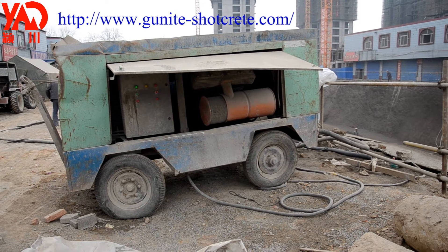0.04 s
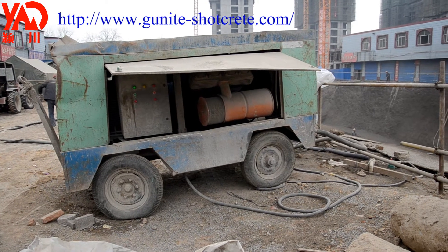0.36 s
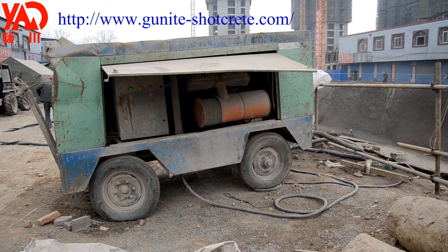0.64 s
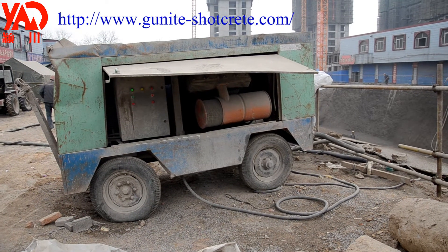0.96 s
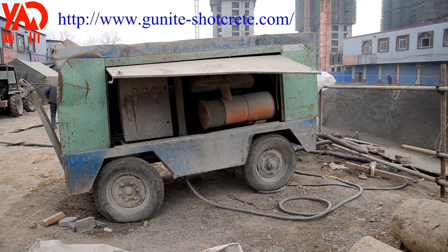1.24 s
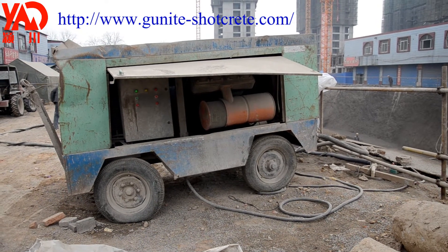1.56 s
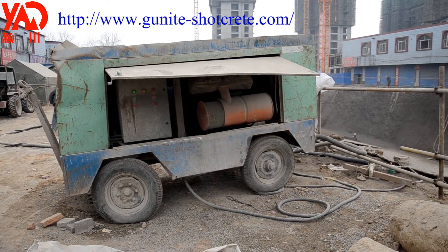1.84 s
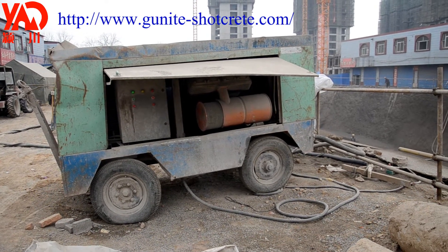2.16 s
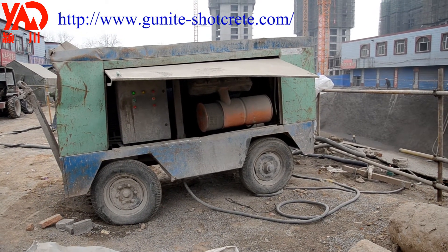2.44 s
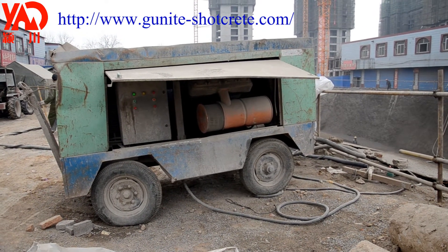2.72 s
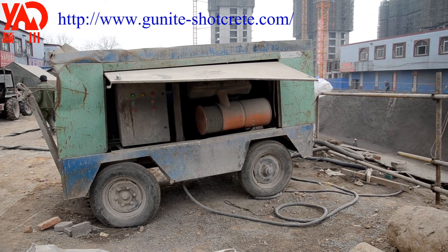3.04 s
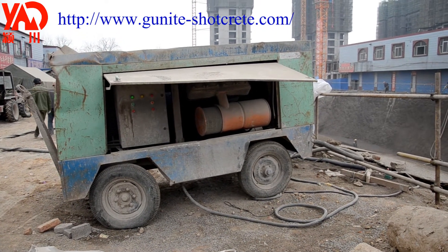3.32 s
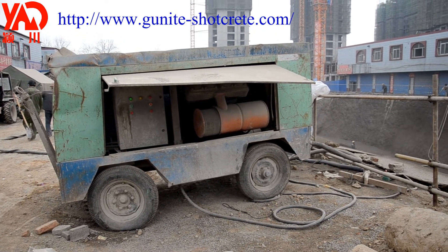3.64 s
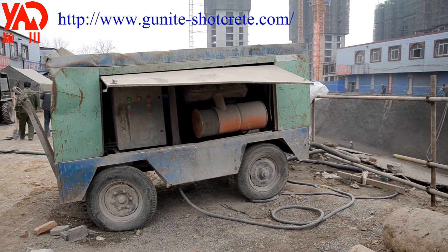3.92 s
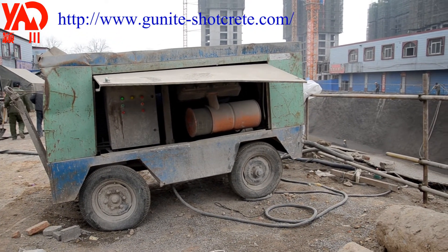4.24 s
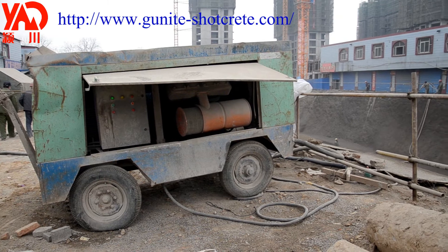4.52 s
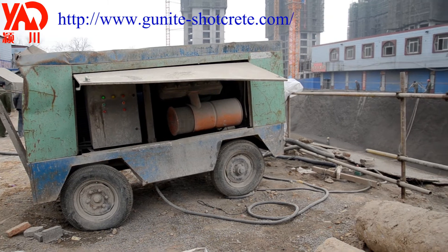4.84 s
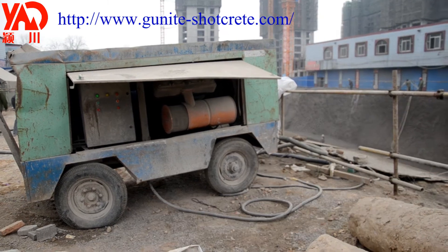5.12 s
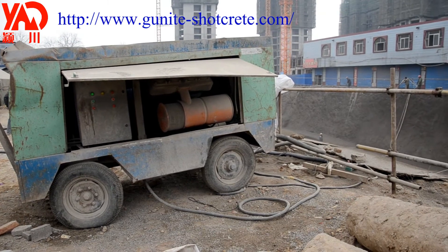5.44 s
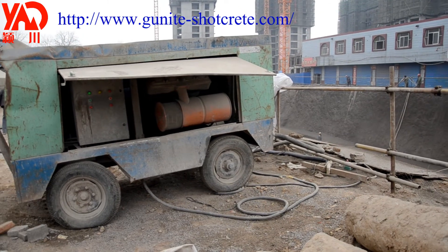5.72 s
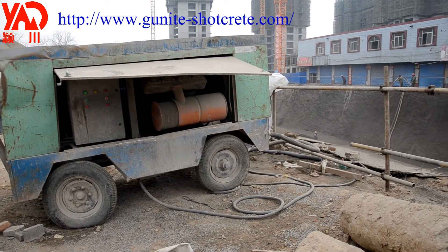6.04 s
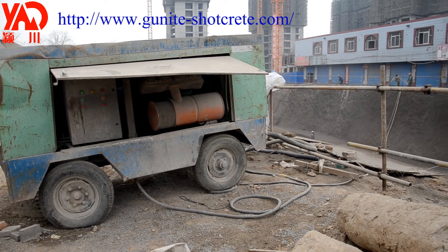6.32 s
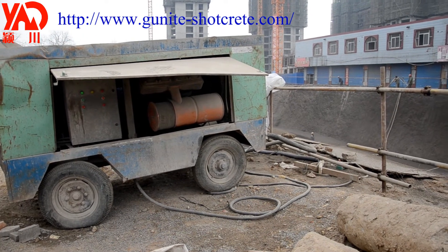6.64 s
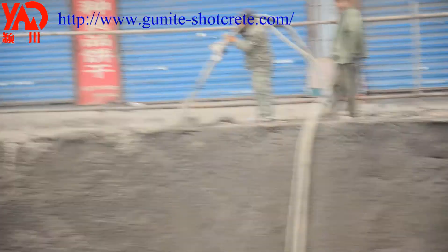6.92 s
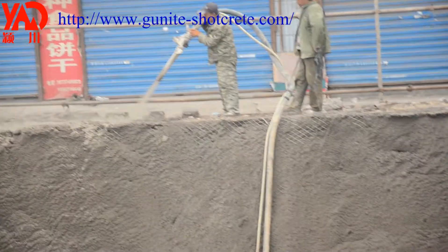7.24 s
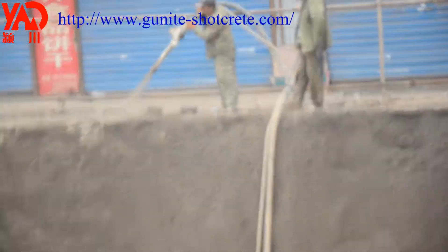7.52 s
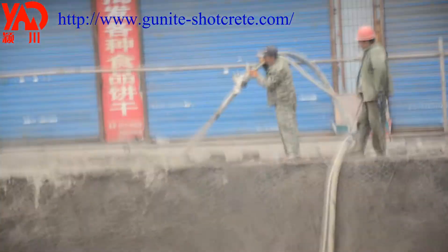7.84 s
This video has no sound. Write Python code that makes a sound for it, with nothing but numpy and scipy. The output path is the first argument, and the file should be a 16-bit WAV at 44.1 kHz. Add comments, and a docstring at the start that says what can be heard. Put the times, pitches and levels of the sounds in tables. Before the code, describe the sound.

A towed diesel air compressor runs close by on a building site, loud and at constant speed, with a throbbing drone, rapid knocking and ticking valves. Near the end the sound switches abruptly to a quieter nozzle spraying concrete: a steady hiss of air with grit peppering a wall. Two pebbles click sharply while machinery hums far off.

```python
"""On a building site, a towed diesel air compressor runs at a steady speed with its side hatch open.
Every engine cycle repeats the same booms and knocks over the rumble of burning fuel and valve clatter.
Then the scene changes abruptly to a nozzle spraying concrete: air hisses, grit peppers the wall,
two pebbles hit sharply, and machinery hums far off."""
import sys
import numpy as np
from scipy import signal
from scipy.fft import rfft, irfft, next_fast_len
from scipy.io import wavfile

SR = 44100
rng = np.random.default_rng(int(sys.argv[2]) if len(sys.argv) > 2 else 0)


def master_out(mix):
    """Clip the mix to full scale and print it as 16-bit PCM to the path in sys.argv[1]."""
    frames = np.transpose(np.atleast_2d(mix))
    ceiling = np.clip(frames, -1, 1)
    pcm = np.round(ceiling * 32767).astype(np.int16)
    wavfile.write(sys.argv[1], SR, pcm)


N = 347067

CYCLE_HZ = 16.571   # engine cycles a second; the drone's harmonics are whole multiples of this
CHANGE_S = 6.782   # from compressor to nozzle

# Booms of the exhaust and hood in one cycle: start_cycles, pitch_hz, width_hz, level_db
BOOMS = [(0.0203, 225, 105, -6.9), (0.0692, 758, 118, -1.3), (0.1882, 247, 119, -7.6),
         (0.2781, 419, 187, -8.7), (0.3337, 1116, 149, -9.3), (0.4133, 627, 108, -3.2),
         (0.4944, 828, 53, 3.4), (0.5799, 141, 130, -5.2), (0.7288, 1105, 98, -2.2),
         (0.7759, 259, 109, 0.2), (0.7875, 641, 96, -5.5), (0.8362, 1049, 76, -7.6)]
# Knocks of the injectors and valves in one cycle: start_cycles, decay_cycles, knock_db, tick_db
KNOCKS = [(0.084, 0.017, -13, -12), (0.237, 0.037, -10, -5), (.303, 0.022, 5, -12), (.335, .04, -16, 8),
          (0.39, 0.035, 6.5, -15), (.435, 0.031, 4, -22), (.497, 0.011, 9, -4), (.545, 0.016, 2.5, -2),
          (.685, 0.85, -2, 1.5), (0.837, 0.051, 1, -7)]
# Overall shape of the drone's harmonics: pitch_hz, level_db
DRONE = [(30, -65), (50, -61), (66, -44.5), (350, -43.5), (520, -35.5), (720, -35.5), (900, -35),
         (1000, -42.5), (1200, -36.5), (2200, -40.5), (3000, -46), (4500, -64)]
# Air ringing inside the hood lifts nearby harmonics: pitch_hz, width_hz, lift_db
HOOD_RESONANCES = [(148.5, 11, 5.5), (238, 47, 12), (302.2, 39.4, 13.5), (439, 7.3, 9.5),
                   (1050, 16.6, 16.5)]
# Harmonics that match a panel's own pitch and sing out: pitch_hz, level_db
SINGING_HARMONICS = [(549.1, -30), (597.5, -29), (646.0, -27), (678.3, -23), (694.4, -27), (829.0, -27),
                     (877.5, -30), (995.9, -33), (1077, -24), (1125, -30), (1179, -34), (1475, -35),
                     (1674, -34), (1970, -34)]
# Low noise of burning fuel: pitch_hz, level_db_per_hz
RUMBLE = [(30, -76), (70, -71.5), (95, -56), (115, -62), (138, -48), (172, -55.5), (260, -44), (380, -52),
          (520, -47), (680, -51.5), (850, -48.5), (1080, -47), (1300, -49.5)]
# High noise of the engine's metal parts: pitch_hz, level_db_per_hz
CLATTER = [(1300, -51.5), (2300, -54), (3200, -58), (4600, -59.5), (5300, -62), (6400, -61.5), (7500, -62),
           (8400, -62), (10000, -69), (12000, -80.5), (14000, -86), (15500, -97.5)]
# Ringing of the engine block and covers: pitch_hz, width_hz, lift_db
CASING = [(635, 59, 3.5), (1160, 51, -2.5), (1190, 90, -1), (1720, 57, 4), (1950, 36, -0.5),
          (2135, 43, 6.5), (2380, 85, 5), (2756, 130, 4.5), (3376, 44, 7), (3670, 70, 2.5), (3930, 27, 0.5),
          (3935, 70, 5), (4575, 80, 4), (7535, 160, 7), (8280, 130, 4.5)]
# Puffs of air through the valves in one cycle: peak_cycles, strength_db
PUFFS = [(.25, 1), (.52, 1), (.71, 2)]
# Air jet and site noise at the nozzle: pitch_hz, level_db_per_hz
SPRAY = [(30, -85), (90, -59.5), (170, -60.5), (290, -56.5), (600, -61), (1000, -62.5), (1600, -63.5),
         (3000, -66), (5000, -63), (6500, -66), (8000, -71), (10500, -78.5), (12500, -92), (15500, -102.4)]
# Tones of distant machinery: pitch_hz, level_db
FAR_TONES = [(64.6, -53), (279.9, -40.5), (495.3, -41), (694.4, -58), (748.3, -46), (893.6, -46),
             (969.0, -45), (1077, -44), (1227, -65), (1981, -50)]
# Pebbles bouncing off: start_s, level_db, second_touch_delay_s, second_touch_lift_db
PEBBLE_HITS = [(7.0250, -13.5, .00044, 5), (7.541, -10.5, .00046, 1.5)]
# Tones a pebble rings with, and their time to fade by 60 dB: pitch_hz, level_db, ring_s
PEBBLE_TONES = [(2060, -8, 0.018), (3220, -2, .006), (4640, 0, 0.007), (6300, -15, .010), (8350, -21, .008),
                (9600, -15, .008)]
# Narrow bands that the microphone housing weakens: pitch_hz, width_hz, depth_fraction
MIC_NOTCHES = [(5750, 480, 0.85), (6910, 190, 0.6)]


def from_db(db):
    """Turn decibels into a number to multiply a sound by."""
    return 10 ** (np.asarray(db) / 20)


def seconds():
    """The time of every sample."""
    return np.arange(N) / SR


def level_at(spectrum, hz):
    """Read a level between the rows of a pitch table, with octaves evenly spaced."""
    pitches, levels = np.transpose(spectrum)
    return np.interp(np.log(np.maximum(hz, 1)), np.log(pitches), levels)


def unit_level(x):
    """Scale a signal so its typical size (rms) is 1."""
    return x / np.sqrt(np.mean(x ** 2) + 1e-20)


def drift(rate_hz, step=32):
    """A smooth random wander with a typical size of 1."""
    size = next_fast_len(N // step + 2)
    hz = np.fft.rfftfreq(size, step / SR)
    slow = irfft(rfft(rng.standard_normal(size)) / (1 + (hz / rate_hz) ** 2) ** 2, size)
    return np.interp(np.arange(N) / step, np.arange(size), unit_level(slow))


def colour(noise, spectrum, low_hz=1, high_hz=SR, resonances=(), size=16384):
    """Shape plain noise with a pitch table, a low and a high limit, and ringing peaks."""
    hz = np.fft.rfftfreq(size, 1 / SR) + 1
    peaks_db = sum(lift / (1 + (2 * (hz - centre) / width) ** 2) for centre, width, lift in resonances)
    band = ((1 + (low_hz / hz) ** 8) * (1 + (hz / high_hz) ** 8)) ** -.5 + 1e-3
    cepstrum = irfft(np.log(from_db(level_at(spectrum, hz) + peaks_db) * band))[:size // 2]
    cepstrum[1:] *= 2   # makes the filter ring only after each blow, never before
    response = irfft(np.exp(rfft(cepstrum, size))) * np.sqrt(SR / 2)
    return signal.oaconvolve(unit_level(noise), response)[:N]


def grains(per_s, spread_db):
    """Tiny impacts at random times; more spread makes their sizes less equal."""
    sizes = from_db(spread_db * np.minimum(rng.exponential(1, N), 4)) * rng.choice([-1, 1], N)
    return unit_level(sizes * (rng.random(N) < per_s / SR))


def crank(wobble_cycles):
    """The engine's place in its cycle, from 0 to 1; a governor keeps the speed almost constant."""
    return (CYCLE_HZ * seconds() + wobble_cycles * drift(2.3)) % 1


def knock_strengths(place):
    """How strong knocks and ticks are along the cycle: each blow jumps up and dies away."""
    knock_power, tick_power = 1, 1
    for start, decay, knock_db, tick_db in KNOCKS:
        dying = np.exp(-2 * ((place - start) % 1) / decay)
        knock_power += dying * from_db(knock_db) ** 2
        tick_power += dying * from_db(tick_db) ** 2
    return np.sqrt(knock_power), np.sqrt(tick_power)


def harmonic_levels(harmonic, scatter_db):
    """The level of each drone harmonic in dB, lifted by the hood, the crank and singing panels."""
    hz = harmonic * CYCLE_HZ
    level = level_at(DRONE, hz)
    level += sum(lift * np.exp(-((hz - centre) / width) ** 2) for centre, width, lift in HOOD_RESONANCES)
    level += 6.5 * (harmonic % 2 == 0) * (hz < 140)   # in the bass, multiples of the crank rate stand out
    # A short echo carves evenly spaced dips.
    spacing_hz, width_hz, depth_db = 382.5, 36, 7.5
    nearest_dip = np.maximum(np.round(hz / spacing_hz), 1) * spacing_hz
    level -= depth_db * np.exp(-((hz - nearest_dip) / width_hz) ** 2)
    # High harmonics land by chance on or between the panels' own pitches.
    level += scatter_db * np.minimum(hz / 1300, 1) ** 6 * rng.uniform(-1.93, 0.58, len(hz))
    for singing_hz, db in SINGING_HARMONICS:
        level[round(singing_hz / CYCLE_HZ)] = db
    return level


def engine_drone(place, scatter_db, knock_share, size=4096):
    """One repeating wave: booms and knocks set its harmonics' timing, the housing sets their levels."""
    harmonic, cycle = np.arange(size // 2 + 1), np.arange(size) / size
    hz = harmonic * CYCLE_HZ
    booms = 0
    for start, centre, width, db in BOOMS:
        delay = np.exp(-2j * np.pi * harmonic * start)
        booms += from_db(db) * delay / (1 + 2j * (hz - centre) / width) ** 2
    knock, _ = knock_strengths(cycle)
    knocks = rfft(unit_level(rng.standard_normal(size) * knock ** 2)) / np.sqrt(size)
    treble = np.minimum(hz / 1300, 1) ** 2   # knocks take over from booms as the pitch rises
    blows = booms + knock_share * treble * knocks
    in_range = (harmonic > 0) & (hz < DRONE[-1][0])
    gains = in_range * from_db(harmonic_levels(harmonic, scatter_db))
    wave = irfft(gains * blows / np.abs(blows)) * size / np.sqrt(2)
    return np.interp(place, cycle, wave, period=1)


def valve_puffs(place):
    """How strong the valve air is along the cycle: each puff builds quickly and fades more slowly."""
    rise_cycles, fall_cycles = 0.054, 0.086
    power = 1
    for peak, db in PUFFS:
        rising = np.exp(-((peak - place) % 1) / rise_cycles)
        falling = np.exp(-((place - peak) % 1) / fall_cycles)
        power += from_db(db) ** 2 * np.maximum(rising, falling)
    return np.sqrt(power)


def metal_cracks(place, spread_db, decay_s):
    """Every metal contact begins with a short crack, of a new strength each time."""
    hits = np.zeros(N)
    for start, _, _, tick_db in KNOCKS:
        passes_start = np.diff((place - start) % 1) < -.5
        hits[1:] += from_db(tick_db) * passes_start
    hits *= from_db(spread_db * np.clip(rng.standard_normal(N), -2, 2))
    dying = signal.lfilter([1], [1, -np.exp(-1 / (decay_s * SR))], hits + 1e-18)
    return unit_level(dying * rng.standard_normal(N))


def compressor(place, unevenness_db, size=4096):
    """The drone, the rumble of burning fuel, knocks, valve ticks and hiss, all timed by the crank."""
    cycle = np.arange(size) / size
    knock, tick = (np.interp(place, cycle, strength) for strength in knock_strengths(cycle))
    air = np.interp(place, cycle, valve_puffs(cycle))
    force = from_db(unevenness_db * drift(120))   # no two blows are alike
    drone = engine_drone(place, scatter_db=11.5, knock_share=0.071)
    burning = rng.standard_normal(N) * knock ** .5
    rumble = colour(burning, RUMBLE, high_hz=1326, resonances=CASING)
    blows = rng.standard_normal(N) * knock * force
    knocking = colour(blows, CLATTER, low_hz=1350, high_hz=3560, resonances=CASING)
    contacts = (rng.standard_normal((2, N)) + 0.83 * grains(per_s=4000, spread_db=0.5)) * tick * force
    cracks = metal_cracks(place, spread_db=4.0, decay_s=.002)
    taps = contacts[0] * air ** 0.34 + from_db(-12) * cracks
    ticking = colour(taps, CLATTER, low_hz=3220, high_hz=8500, resonances=CASING)
    puffs = contacts[1] * air ** 1.7 + from_db(-6) * cracks
    hiss = colour(puffs, CLATTER, low_hz=8800, resonances=CASING)
    return drone + from_db(-0.2) * rumble + from_db(-0.34) * knocking + from_db(-1) * (ticking + hiss)


def nozzle(level_db, flutter_db):
    """Compressed air hisses out with a slight flutter, carrying grit that peppers the wall."""
    jet = rng.standard_normal(N) + .5 * grains(per_s=2000, spread_db=0)
    return from_db(level_db + flutter_db * drift(25)) * colour(jet, SPRAY)


def far_machinery(steady_below_hz, swell_hz):
    """Engine tones from across the site swell and fade as their echoes mix; low ones stay steadier."""
    t, tones = seconds(), 0
    echoes = drift(swell_hz) + 1j * drift(swell_hz)
    for k, (hz, db) in enumerate(FAR_TONES):
        direct = steady_below_hz / hz
        own_echoes = np.roll(echoes, k * N // len(FAR_TONES))
        arrival = (direct * np.sqrt(2) + own_echoes) / np.hypot(1, direct)
        tones += from_db(db) * np.real(arrival * np.exp(2j * np.pi * hz * t))
    return tones


def pebbles(high_hz, crunch_db, crunch_s):
    """Each pebble crunches on grit, touches twice and rings briefly, with no bass beneath it."""
    t, clicks, crunch = seconds(), np.zeros(N) + 1e-18, 0
    for start_s, db, delay_s, lift_db in PEBBLE_HITS:
        clicks[round(start_s * SR)] += from_db(db)
        clicks[round((start_s + delay_s) * SR)] += from_db(db + lift_db)
        dying = np.exp(-np.minimum(np.abs(t - start_s) / crunch_s, 20))
        crunch += from_db(db + crunch_db) * (t >= start_s) * dying
    sound = crunch * rng.standard_normal(N)
    for hz, db, ring_s in PEBBLE_TONES:   # each click sets off fading sine waves
        fade = np.exp(-np.log(1000) / (ring_s * SR))
        angle = 2 * np.pi * hz / SR
        feedback = [1, -2 * fade * np.cos(angle), fade * fade]
        sound += signal.lfilter([0, from_db(db) * np.sin(angle)], feedback, clicks)
    sound = signal.sosfilt(signal.butter(2, 200, "high", fs=SR, output="sos"), sound)
    return signal.sosfilt(signal.butter(8, high_hz, fs=SR, output="sos"), sound)


def scene():
    """First beside the compressor, then at the nozzle, where the engine still throbs faintly."""
    beside = np.clip((CHANGE_S - seconds()) / .002 + .5, 0, 1)   # falls from 1 to 0 in 2 ms
    place = crank(wobble_cycles=0.00031)
    engine = compressor(place, unevenness_db=.5)
    far = from_db(-0.5) * far_machinery(steady_below_hz=348, swell_hz=12)
    far += from_db(-26) * engine_drone(place, scatter_db=7.0, knock_share=.1)
    spraying = nozzle(level_db=-1.0, flutter_db=0.85) + far
    spraying += pebbles(high_hz=10000, crunch_db=-5.0, crunch_s=0.0028)
    return (beside * engine + (1 - beside) * spraying)[None]


def record(dry):
    """The microphone housing weakens two narrow bands; peaks are rounded and the top treble is cut."""
    for hz, width, depth in MIC_NOTCHES:
        notched = signal.lfilter(*signal.iirnotch(hz, hz / width, fs=SR), dry)
        dry = (1 - depth) * dry + depth * notched
    rounded = dry / (1 + dry ** 8) ** (1 / 8)
    cutoff_hz = 15700
    return signal.sosfilt(signal.ellip(12, .1, 90, cutoff_hz, fs=SR, output="sos"), rounded)


dry = scene()
out = record(dry)
master_out(out)
```